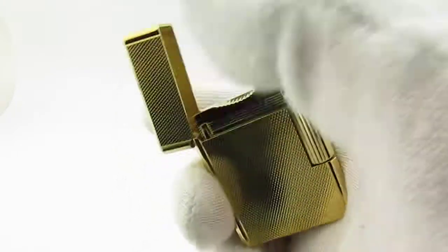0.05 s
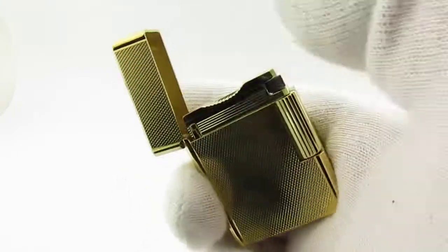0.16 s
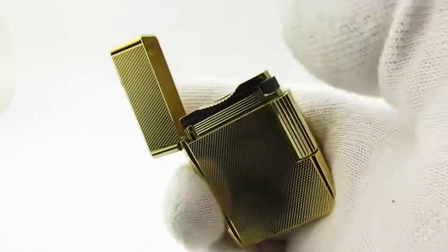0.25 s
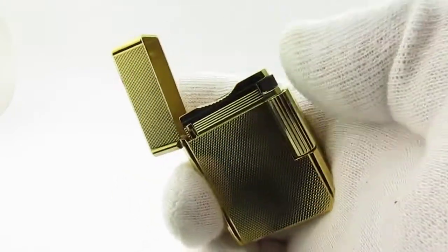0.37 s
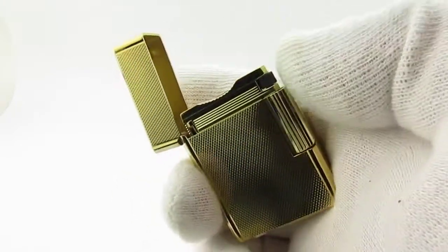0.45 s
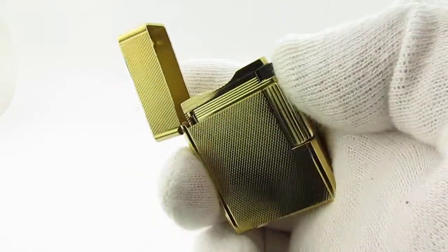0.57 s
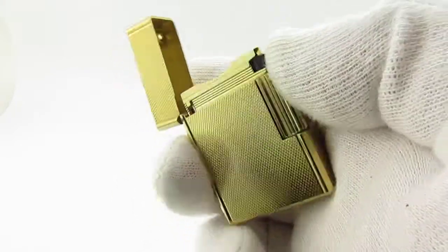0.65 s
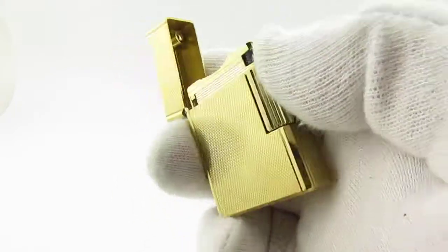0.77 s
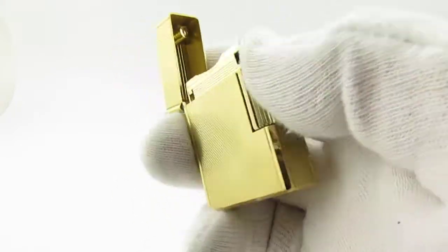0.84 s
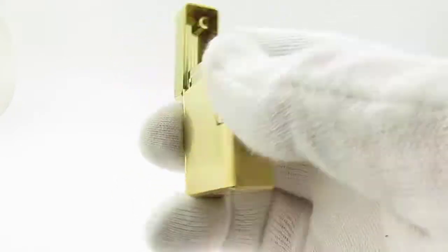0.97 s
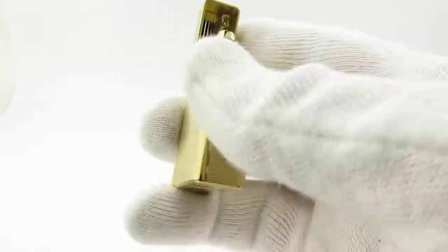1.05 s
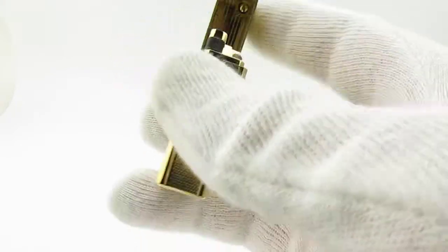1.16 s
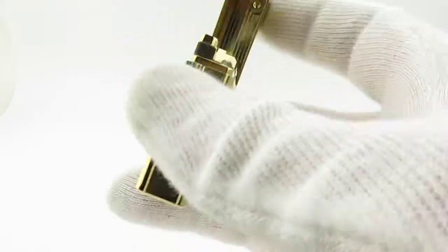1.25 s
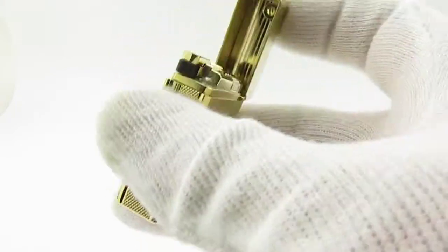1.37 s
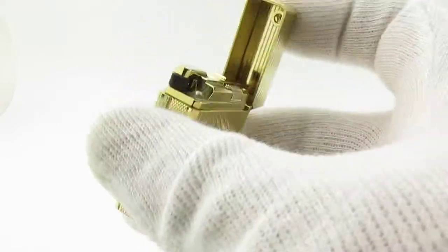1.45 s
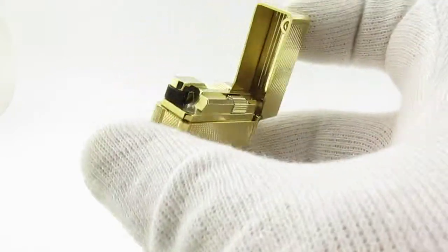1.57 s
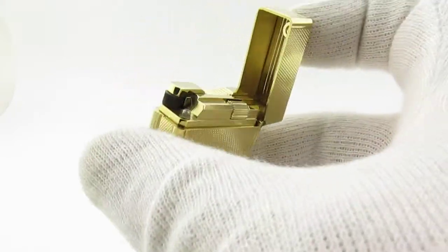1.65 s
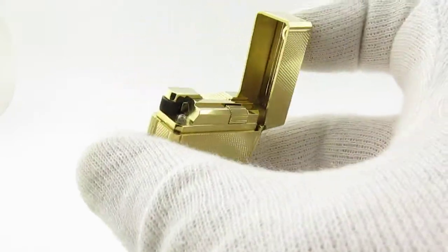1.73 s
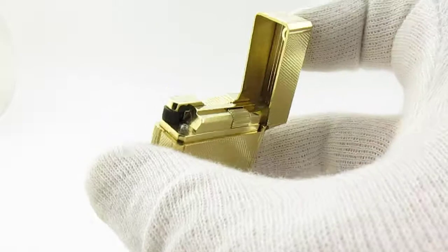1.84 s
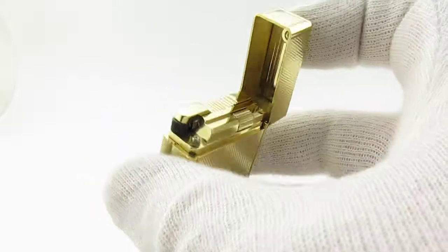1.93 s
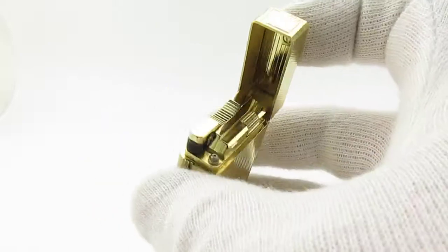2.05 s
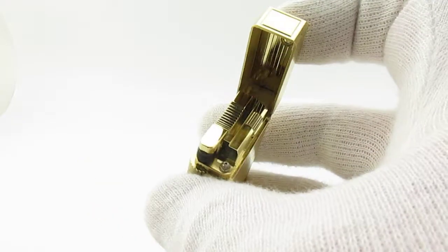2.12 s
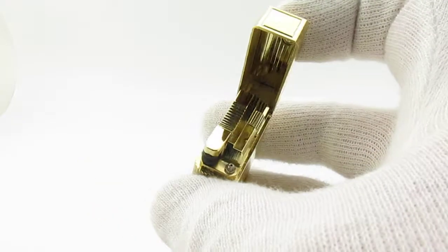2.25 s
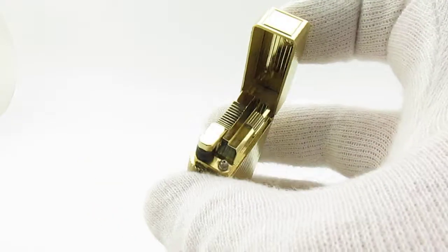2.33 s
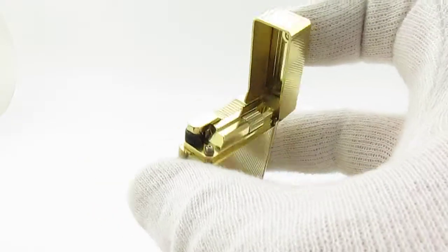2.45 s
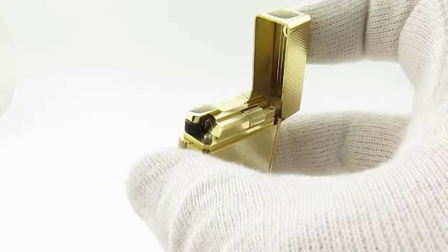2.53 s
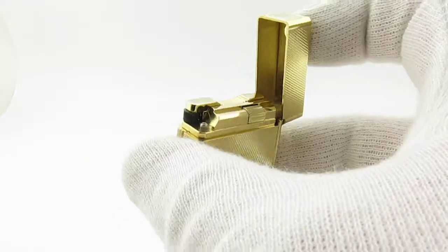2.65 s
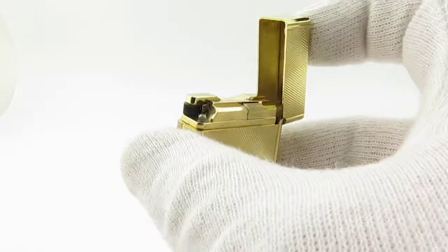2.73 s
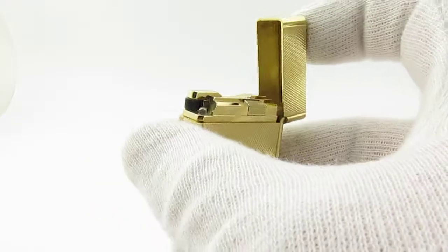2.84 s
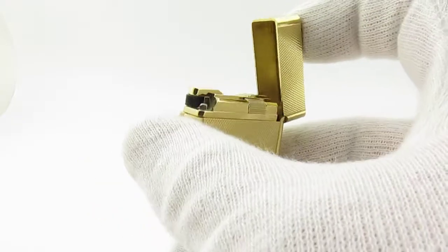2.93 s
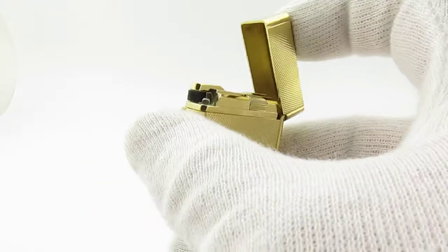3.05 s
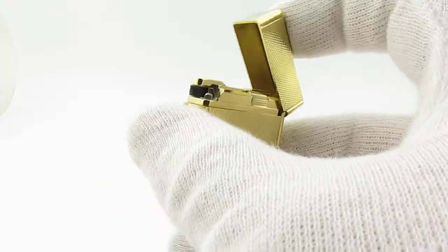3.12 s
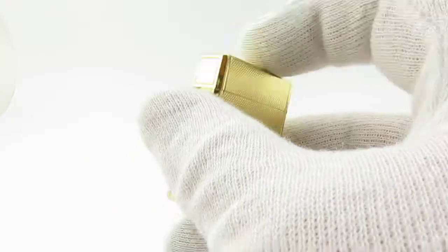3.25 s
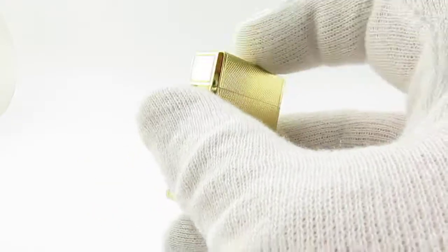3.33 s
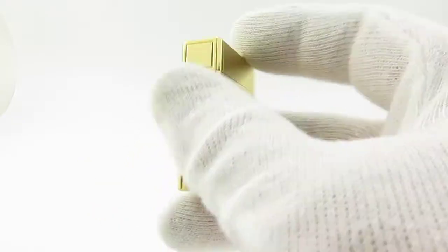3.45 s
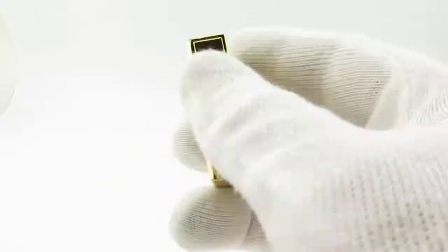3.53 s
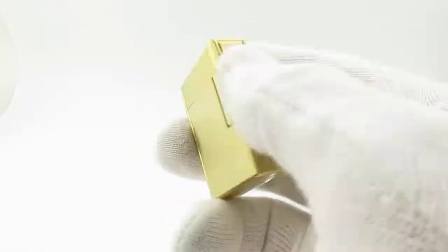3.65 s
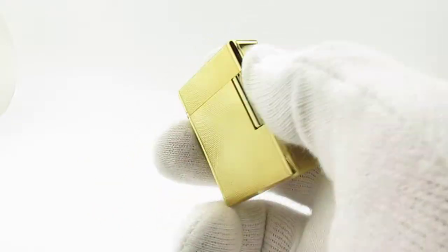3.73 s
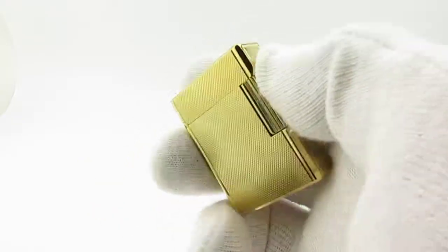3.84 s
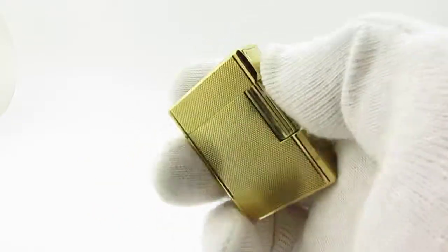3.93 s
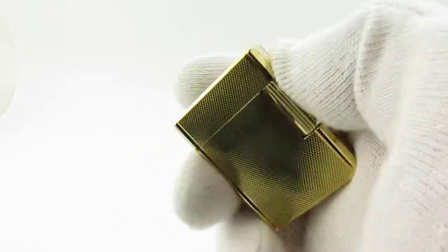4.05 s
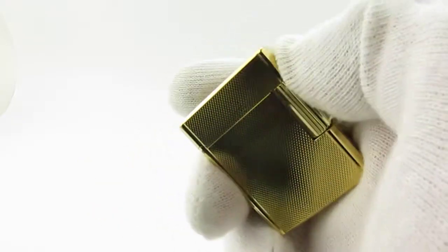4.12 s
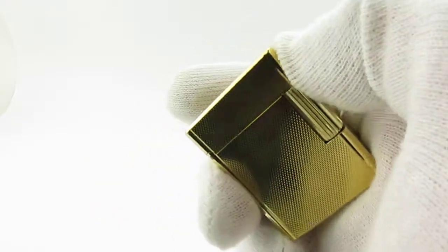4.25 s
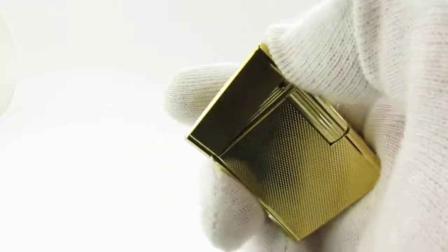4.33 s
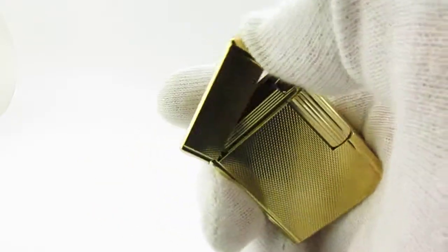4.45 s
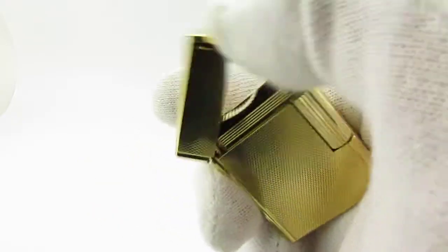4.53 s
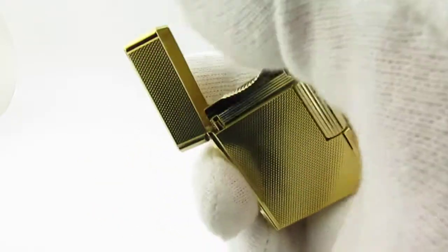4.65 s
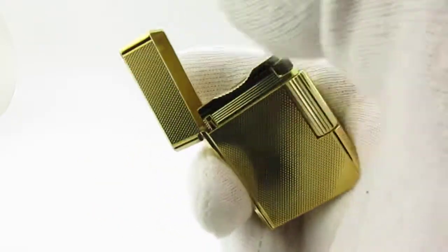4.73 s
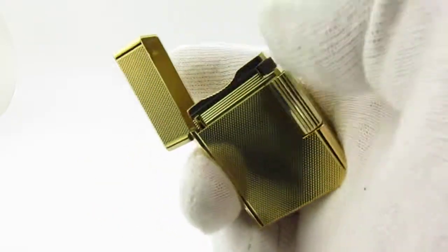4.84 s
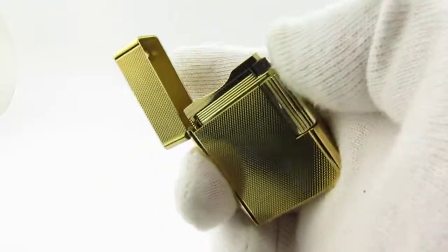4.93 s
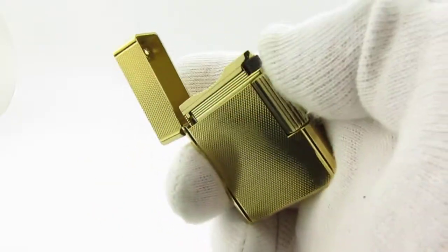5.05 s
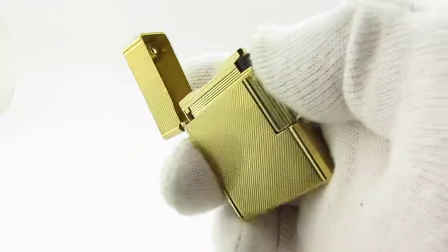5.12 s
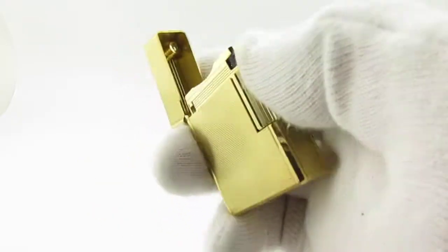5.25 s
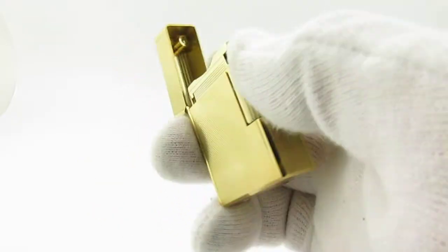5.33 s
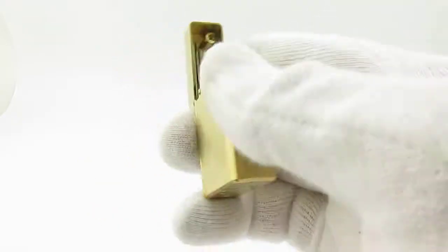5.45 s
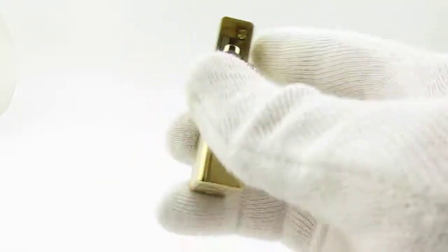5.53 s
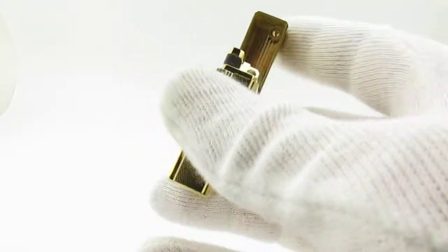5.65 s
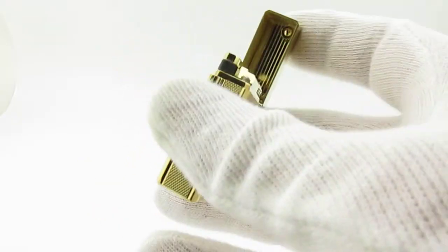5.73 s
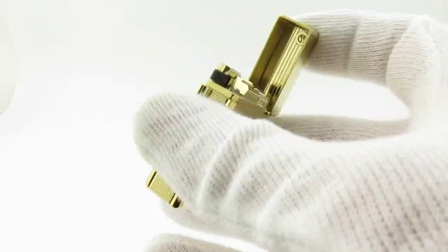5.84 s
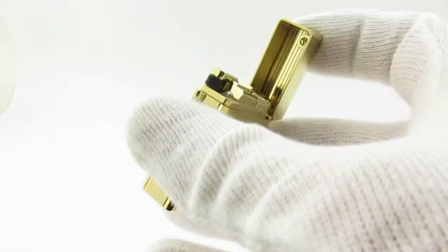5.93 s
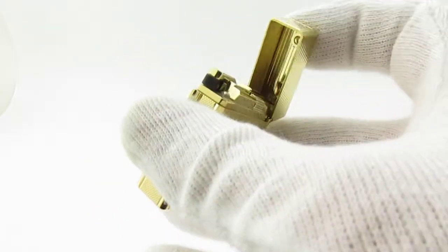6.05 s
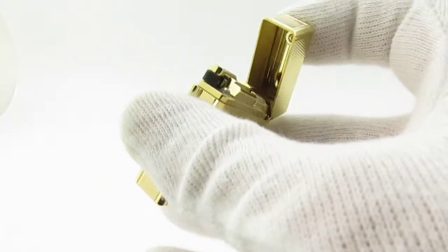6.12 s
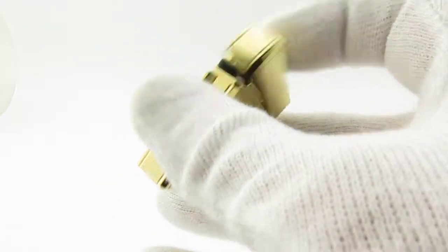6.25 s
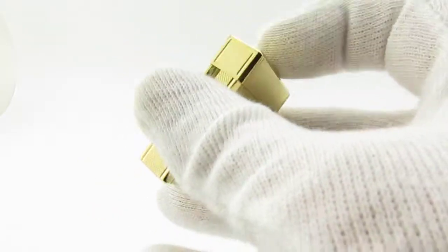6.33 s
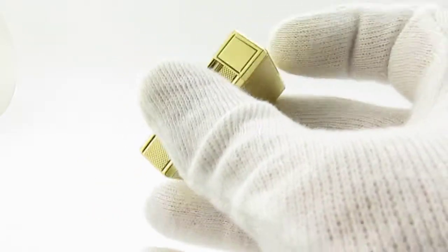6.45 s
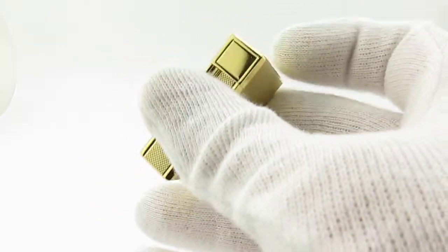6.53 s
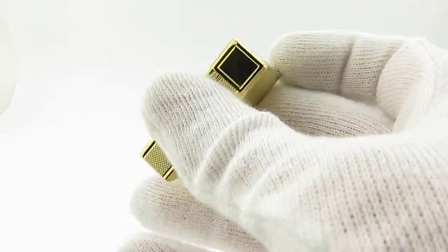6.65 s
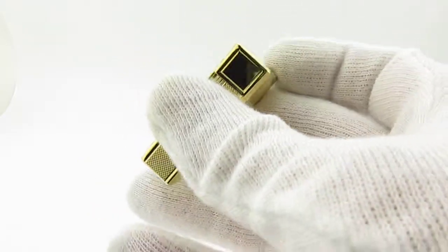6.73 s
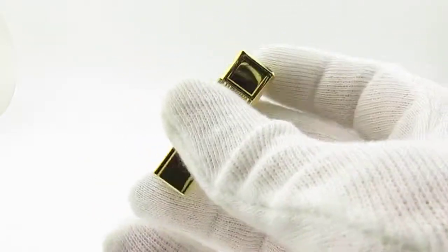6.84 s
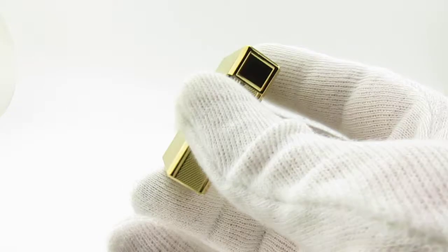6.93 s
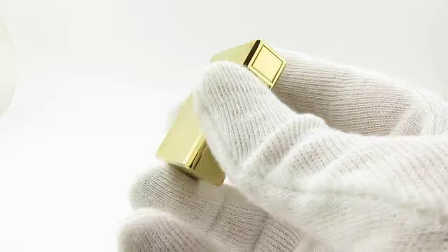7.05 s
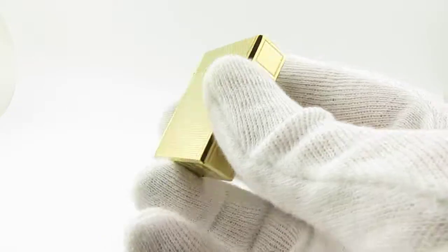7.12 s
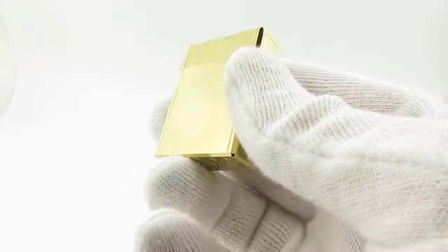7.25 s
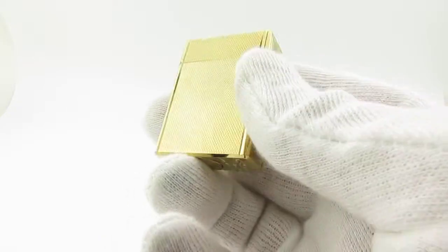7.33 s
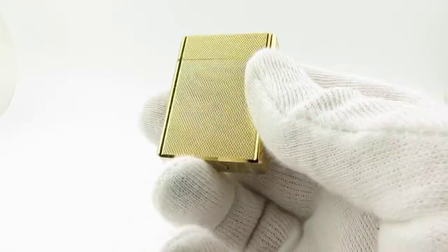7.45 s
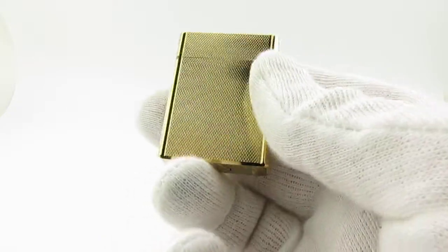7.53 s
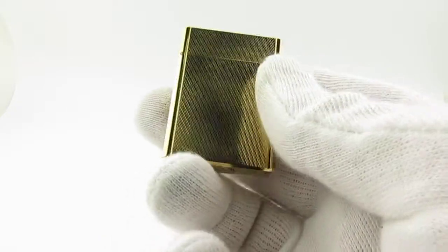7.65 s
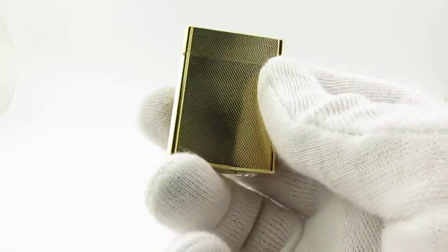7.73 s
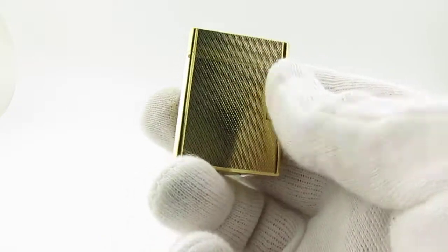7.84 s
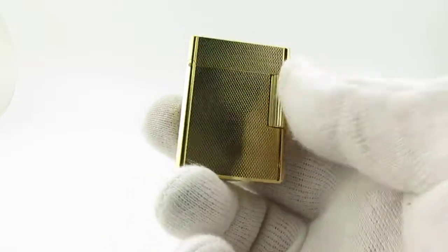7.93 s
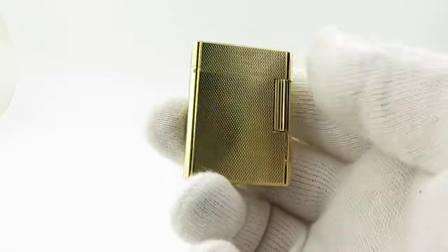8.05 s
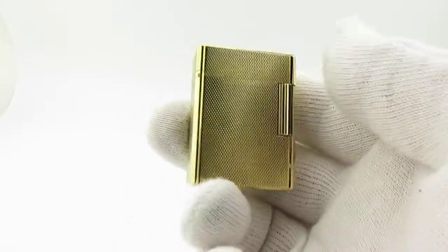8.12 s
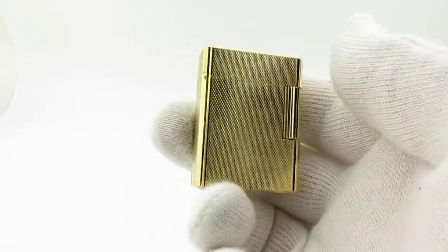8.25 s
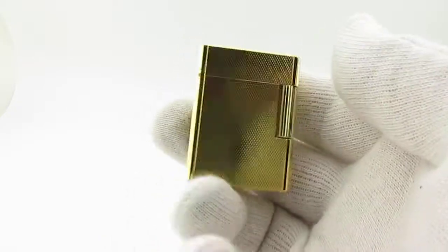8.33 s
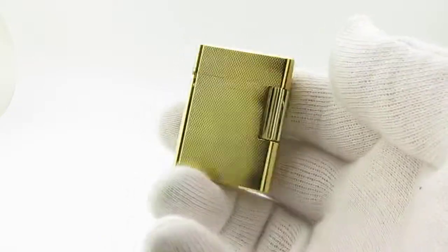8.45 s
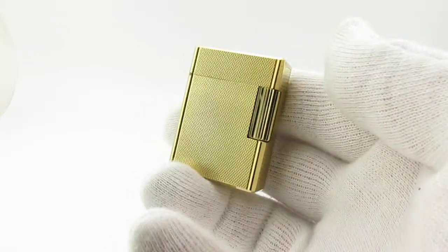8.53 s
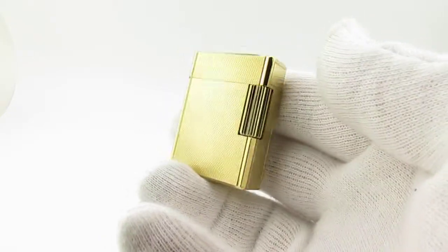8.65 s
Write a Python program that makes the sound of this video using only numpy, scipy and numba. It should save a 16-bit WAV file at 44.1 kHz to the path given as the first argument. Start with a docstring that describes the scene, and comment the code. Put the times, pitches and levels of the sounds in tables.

```python
"""A brass lighter's lid is flicked open and snapped shut, twice, by a gloved hand close to a small camera.
Each blow rings the lid's damped modes under a noise crack and a thud; landings also make the case shimmer.
Gas hisses as filtered noise while the lid stands open; gloves rustle and scrape, and fingers tick.
The quiet room adds a diffuse echo, room tone, hum, rumble and faint tones.
The camera's gain ducks after loud blows and slowly lets the room noise back; peaks over full scale clip."""
import sys
import numpy as np
from scipy import signal
from scipy.fft import rfft, irfft, next_fast_len
from scipy.io import wavfile
from scipy.ndimage import uniform_filter1d
from numba import njit

SR = 44100
rng = np.random.default_rng(int(sys.argv[2]) if len(sys.argv) > 2 else 0)


def materialize(psi):
    """Save the field psi as 16-bit PCM at rate SR to the path in sys.argv[1].

    A 1-D psi becomes a single channel; in a 2-D psi each row is a channel.
    """
    bounded = np.clip(np.atleast_2d(psi).T, -1, 1)
    quanta = np.round(bounded * 32767).astype(np.int16)
    wavfile.write(sys.argv[1], SR, quanta)


N = 382562
TIME = np.arange(N) / SR

# the lid meets its stop: [start_s, force_db]
FLICKS = [(0.0008, -.5), (4.5478, -.5)]
# the lid lands on the body: [start_s, force_db]
SNAPS = [(3.2441, 0), (6.2581, -.5)]
# each flick: the latch lets go, the lid hits the stop and rattles there:
# [after_stop_s, ring_db, crack_db, hardness_db_per_octave]
OPENING = [(-.0091, -46, -17, -1.5), (0, -23, -19, 4), (.0012, -22, -9, 7), (.004, -28, -24, -3),
           (.007, -27, -26, 1.5), (.0137, -28, -26, 1.5), (.0168, -27, -20, -1.5),
           (.0215, -27.5, -27, -1.5)]
# each snap: the lid lands and bounces ever lower:
# [after_landing_s, ring_db, crack_db, hardness_db_per_octave]
SHUTTING = [(0, -0.5, 0.5, -1.5), (.0009, -6.5, -2.5, 2.5), (.0018, -14.5, -13.5, 0),
            (.0037, -16.5, -11.5, 1.5), (.0063, -19, -17.5, 2.5), (0.0089, -20.5, -17.5, 6)]
# lid modes, levels relative to each blow:
# [pitch_hz, open_level_db, shut_level_db, open_t60_s, shut_t60_s, left_minus_right_db]
LID_MODES = [(2010, -27, -24, 0.073, 0.1, -3), (2810, -10, -12.5, 0.039, 0.03, 0),
             (3050, -9.5, -16.5, 0.032, 0.012, -1.5), (3710, -9.5, -26, 0.079, .02, -1),
             (3840, -16, -24.5, 0.044, .02, 3.5), (4790, -63, -7.5, 0.03, 0.017, -3),
             (4581, 7, -22, .25, .6, 1), (4538, -30, -24, .2, .5, -1), (4642, -30, -26, .2, .45, 1),
             (4370, -11, -15, 0.017, .03, -4.5), (5920, -9.5, -13.5, 0.027, 0.026, -2.5),
             (5620, -8.5, -14.5, 0.016, 0.0092, -5.5), (6120, -13.5, -7.5, 0.033, 0.028, -5.5),
             (6902, -21, -20, 0.056, 0.011, -0.5), (7500, -23.5, -9.5, 0.054, 0.028, 2.5),
             (8100, -15, -10.5, 0.029, 0.027, -1), (8680, -11, -5, 0.075, .06, 5),
             (9240, -16.5, -11, 0.018, 0.031, 1.5), (10050, -11.5, -11.5, .03, 0.21, 2),
             (9423, -7.5, -10, 0.012, 0.018, 5.5), (11420, -7.5, -12, 0.036, 0.14, 5),
             (10730, -12, -7, 0.014, .06, 6), (12570, -17, -10, .02, 0.016, 9),
             (13070, -11, -10, .025, .035, 8), (14220, -22, -9, .02, 0.021, 3),
             (14780, -24, -4, .02, .06, 0), (15734, -20.5, -6.5, .02, 0.046, -2)]
# colour of the crack before hardness: [pitch_hz, open_db_per_hz, shut_db_per_hz]
CRACK_COLOUR = [(500, -10, -33), (1500, -19.5, -20), (2400, -16, -10.5), (3100, 0, -11.5),
                (6000, -2.5, 1.5), (7800, -8.5, -8), (9600, -1, 0.5), (12787, -10.5, 0.5),
                (14700, -16, 0.5)]
# the closed case rings on too many modes to tell apart: [pitch_hz, level_db_per_hz]
CASE_COLOUR = [(900, -26), (1900, -4), (3300, -7), (4250, -10), (4600, 2), (4950, -8), (7900, -8),
               (8500, 3), (9000, -5), (10700, 0), (14100, -5), (14750, 4), (15300, -5)]
# small ticks and knocks as the fingers shift: [start_s, level_db, pitch_hz, t60_s, left_minus_right_db]
TICKS = [(3.735, -41, 6700, 0.003, -13), (3.735, -44.5, 2000, 0.0035, -16), (4.547, -45, 190.4, 0.16, -9),
         (7.487, -52.5, 1005, 0.013, -6), (7.560, -53, 10000, 0.0069, -1), (8.035, -54, 1045, .02, -5),
         (8.315, -50, 1100, 0.02, -7), (8.418, -52, 1076, 0.02, -1.5)]
# resonances of the burner's small cavities: [pitch_hz, width_hz, level_db]
GAS_CAVITIES = [(2880, 550, -3), (8700, 530, -7), (10700, 550, 1), (13000, 720, -1)]
# glove cloth sliding over metal and cloth: [start_s, length_s, level_db]
RUBS = [(.66, .1, -61.5), (.79, 0.028, -58.5), (.9, .08, -61.5), (3.97, .13, -58.5), (4.3, 0.54, -63.5),
        (5.18, .12, -63.5), (5.36, 0.2, -64.5), (6.75, .03, -61), (7.58, 0.057, -71), (7.86, 0.22, -67.5)]
# colour of the cloth rustle: [pitch_hz, level_db_per_hz]
CLOTH_COLOUR = [(1500, -19.5), (3000, -2.5), (4200, -2.5), (6500, -1.5), (8000, -2.5), (10500, 1.5),
                (13000, -4.5), (15800, -8)]
# glove fibres catching an edge, narrower than the rustle: [start_s, end_s, pitch_hz, width_hz, level_db]
SCRAPES = [(0.764, 0.853, 4470, 1500, -63.5), (4.403, 4.496, 3600, 900, -64.5),
           (4.43, 4.5, 11100, 1500, -64), (5.19, 5.32, 4020, 706, -69)]
# colour of the room's echo: [pitch_hz, level_db_per_hz]
ECHO_COLOUR = [(300, -24.5), (1000, -11), (2000, -3), (4600, 2), (7500, -2.5), (10500, -5), (15000, -8.5)]
# colour of the room tone: [pitch_hz, level_db_per_hz]
ROOM_TONE_COLOUR = [(15, -34), (25, -3), (48, -3.5), (82, -6.5), (153, -6.5), (211, -10), (241, -8.5),
                    (621, -20.5), (1070, -22), (1980, -27.5), (6510, -33.5), (10600, -31), (15900, -38.5)]
# stereo width of the room tone: [pitch_hz, left_right_correlation]
ROOM_LIKENESS = [(50, -0.052), (130, -.4), (500, -0.22), (1400, 0.0068), (15000, -0.022)]
# far traffic rumble swelling: [start_s, length_s, level_db]
RUMBLE_SWELLS = [(.6, 0.8, -54.5), (4.62, 0.31, -52), (6.0, 0.3, -60), (8.3, .4, -60)]
# faint far tones that come and go: [start_s, end_s, pitch_hz, level_db]
TONES = [(1.603, 1.85, 366.6, -67.5), (2.343, 2.5, 736, -68.5), (3.403, 4.005, 736, -73),
         (4.651, 5.2, 46.54, -51), (5.872, 6.25, 292, -62)]

LATCH_THUD_DB, LANDING_THUD_DB = -6, 3  # first contact of a flick and of a snap
BOUNCE_THUD_DB = -24  # later contacts, relative to their crack
THUD_OPEN_HZ, THUD_SHUT_HZ, THUD_RISE_S, THUD_FALL_S = 2800, 4800, .00007, .0003
CRACK_T60_OPEN_S, CRACK_T60_SHUT_S, CRACK_LIKENESS = .025, .008, .45  # likeness: left-right correlation
PHASE_SPREAD = .23  # share of a turn by which a mode can differ between the microphones
KEPT_DB = -7  # each new contact chokes the ringing left by the blows before it
SMALL_BODY_HZ = 580  # the lighter is too small to radiate well below this
CASE_DB, CASE_T60_S = -23.5, 0.47
GAS_DB, GAS_BUILD_S = -71.5, .45  # full flow; time to reach it once the lid is open
RUB_RISE_DB_S, RUB_FALL_DB_S = 160, 70  # slopes around a slide
GRIP_DB = -75.5  # the faint rustle between slides
ECHO_DB, ECHO_T60_S, ECHO_GAP_S = -23, .4, .006  # the gap is the echo's build-up time constant
ROOM_TONE_DB = -54
HUM_HZ, HUM_WIDTH_HZ, HUM_DB = 212.1, 4.7, -66
RUMBLE_DB, RUMBLE_SLOPE_DB_S = -63.5, 27  # between swells; slope of each swell
MIC_LOW_HZ, TOP_HZ = 32, 15800
DUCK_AT_DB, DUCK_SLOPE = -13.5, 1.5  # threshold; dB of cut per dB over it
DUCK_SENSE_S, DUCK_ATTACK_S, DUCK_HOLD_S, DUCK_RELEASE_S = 0.0045, 0.014, 0.45, 0.5


def lid():
    """Every blow rings the modes, cracks the faces and pushes the whole body in one thud."""
    out = np.zeros((2, N))
    pitch_hz, open_db, shut_db, open_t60, shut_t60, pan_db = np.transpose(LID_MODES)
    crack_hz, crack_open, crack_shut = np.transpose(CRACK_COLOUR)
    reach = mode_reach(pan_db)
    flicks = contacts(FLICKS, OPENING, LATCH_THUD_DB)
    snaps = contacts(SNAPS, SHUTTING, LANDING_THUD_DB)
    # the opening thud pushes the air the opposite way to the shutting one
    for blows, mode_db, t60, colour_db, crack_t60, thud_hz, way in (
            (flicks, open_db, open_t60, crack_open, CRACK_T60_OPEN_S, THUD_OPEN_HZ, -1),
            (snaps, shut_db, shut_t60, crack_shut, CRACK_T60_SHUT_S, THUD_SHUT_HZ, 1)):
        t = np.arange(SR // 2) / SR
        modes = np.exp(2j * np.pi * pitch_hz[:, None] * t) * decay(t, t60[:, None])
        colour = np.transpose([crack_hz, colour_db])
        lead, push = thud(thud_hz)
        times = np.array(blows)[:, 0]
        for s, ring_db, crack_db, thud_db, hard_db in blows:
            strength = undb(ring_db + mode_db + hard_db * np.log2(pitch_hz / 6000))
            ring = ((reach * strength) @ modes).imag
            add(out, s, choke(times, s, t) * ring)
            add(out, s, undb(crack_db) * crack(colour, hard_db, crack_t60))
            add(out, s + lead[0], way * undb(thud_db) * np.tile(push, (2, 1)))
    return signal.sosfilt(signal.butter(1, SMALL_BODY_HZ, "high", fs=SR, output="sos"), out)


def mode_reach(pan_db):
    """Each mode reaches each microphone with its own phase and strength."""
    turn, skew = rng.random((len(LID_MODES), 2)).T - np.array([[0], [.5]])
    phase = turn + PHASE_SPREAD * skew * np.array([[1], [-1]])
    return undb([pan_db / 2, -pan_db / 2]) * np.exp(2j * np.pi * phase)


def choke(times, s, t):
    """Every later contact damps the ringing of the blow at s by a further step."""
    later = np.searchsorted(times, s + t) - np.searchsorted(times, s) - 1
    return uniform_filter1d(undb(KEPT_DB * np.maximum(later, 0)), size=16)


def crack(colour, hard_db, t60):
    """The faces meet in a short noise burst; a harder contact tilts it towards the treble."""
    size = 2048
    burst = noise(lambda f: undb(on_log(colour, f) + hard_db * np.log2(f / 6000 + 0.053)), size,
                  lambda f: CRACK_LIKENESS + 0 * f)
    return burst * decay(np.arange(size) / SR, t60)


def thud(pitch_hz):
    """The body is pushed: a steep rise up to the contact, then a heavily damped swing."""
    lead = np.arange(-40, 200) / SR
    swing = np.cos(2 * np.pi * pitch_hz * lead) * np.exp(-lead / THUD_FALL_S)
    return lead, np.where(lead < 0, np.exp(lead / THUD_RISE_S), swing)


def contacts(events, pattern, thud_db):
    """Rows (s, ring dB, crack dB, thud dB, hardness) of one pattern played at every event."""
    rows = []
    for s, force_db in events:
        for k, (lag, ring_db, crack_db, hard_db) in enumerate(pattern):
            push_db = crack_db + BOUNCE_THUD_DB if k else thud_db
            rows.append((s + lag, force_db + ring_db, force_db + crack_db, force_db + push_db, hard_db))
    return rows


def case():
    """Each landing of the lid leaves a dense shimmer of decaying noise in the closed case."""
    out, t = np.zeros((2, N)), np.arange(SR // 2) / SR
    for s, ring_db, *_ in contacts(SNAPS, SHUTTING, LANDING_THUD_DB):
        shimmer = noise(lambda f: undb(on_log(CASE_COLOUR, f)), len(t))
        add(out, s, undb(ring_db + CASE_DB) * decay(t, CASE_T60_S) * shimmer)
    return out


def ticks():
    """Each tick is one damped resonance."""
    out, t = np.zeros((2, N)), np.arange(SR // 4) / SR
    for s, db, hz, t60, pan_db in TICKS:
        sides = undb(db + np.array([[pan_db], [-pan_db]]) / 2)
        add(out, s, sides * np.sin(2 * np.pi * hz * t) * decay(t, t60))
    return out


def gas():
    """A thin jet builds up once the lid is open and stops when it shuts, coloured by the burner's cavities."""
    flow = np.zeros(N)
    for (opened, _), (shut, _) in zip(FLICKS, SNAPS):
        flow += (TIME < shut) * np.clip((TIME - opened) / GAS_BUILD_S, 0, 1)
    hiss = noise(lambda f: sum(undb(db) * band(hz, width)(f) for hz, width, db in GAS_CAVITIES), N,
                 lambda f: 0.36 + 0 * f)
    return undb(GAS_DB) * flow * hiss


def gloves():
    """Knitted cloth slides in a slightly uneven rustle of coloured noise."""
    slides = swells(RUBS, GRIP_DB, RUB_RISE_DB_S, RUB_FALL_DB_S)
    unevenness = undb(1.8 * walk(47))
    return slides * unevenness * noise(lambda f: undb(on_log(CLOTH_COLOUR, f)), N, lambda f: 0.43 + 0 * f)


def scrapes():
    """Fibres catching an edge sound as short swells of narrow noise."""
    out = np.zeros((2, N))
    for start, end, hz, width_hz, db in SCRAPES:
        size = int((end - start) * SR)
        add(out, start, undb(db) * np.sqrt(np.hanning(size)) * noise(band(hz, width_hz), size))
    return out


def room(x):
    """Walls return a diffuse tail, different left and right."""
    t = np.arange(int(.7 * SR)) / SR
    build_up = 1 - np.exp(-t / ECHO_GAP_S)
    tail = noise(lambda f: undb(on_log(ECHO_COLOUR, f)), len(t)) * decay(t, ECHO_T60_S) * build_up
    tail /= np.sqrt(np.sum(tail ** 2) / 2)  # unit energy per side on average
    return undb(ECHO_DB) * signal.fftconvolve(x, tail, axes=1)[:, :N]


def background():
    """Room tone, a wavering narrow hum, swelling low rumble and faint tones lie under everything."""
    tone = noise(lambda f: undb(on_log(ROOM_TONE_COLOUR, f)), N, lambda f: on_log(ROOM_LIKENESS, f))
    hum = undb(HUM_DB + 1.1 * walk(3.6)) * noise(band(HUM_HZ, HUM_WIDTH_HZ), N)
    surge = swells(RUMBLE_SWELLS, RUMBLE_DB, RUMBLE_SLOPE_DB_S, RUMBLE_SLOPE_DB_S)
    rumble = surge * noise(band(47, 22), N, lambda f: 0.34 + 0 * f)
    return undb(ROOM_TONE_DB) * tone + hum + rumble + tones()


def tones():
    """Each far tone is a sine that swells and fades softly."""
    out = np.zeros((2, N))
    for start, end, hz, db in TONES:
        t = np.arange(int((end - start) * SR)) / SR
        fade = np.sqrt(np.sin(np.pi * t / (end - start)))
        add(out, start, np.tile(undb(db) * fade * np.sin(2 * np.pi * hz * t), (2, 1)))
    return out


def swells(rows, base_db, rise_db_s, fall_db_s):
    """Gain that climbs from a base to each (start, length, dB) row, holds and sinks back."""
    db = np.full(N, base_db * 1.)
    for start, length, top_db in rows:
        before = np.maximum(start - TIME, 0)
        after = np.maximum(TIME - start - length, 0)
        db = np.maximum(db, top_db - rise_db_s * before - fall_db_s * after)
    return undb(db)


def noise(gain_at, size, likeness_at=np.zeros_like):
    """Stereo noise of rms 1 with a given colour and left-right correlation."""
    n = next_fast_len(size)
    hz = np.arange(n // 2 + 1) * SR / n
    like = np.clip(likeness_at(hz), -1, 1)
    spectra = rfft(rng.standard_normal((2, n))) * gain_at(hz)
    mid, side = spectra * np.sqrt([1 + like, 1 - like])
    return level(irfft([mid + side, mid - side], n)[:, :size], 0)


def band(centre_hz, width_hz):
    """Gain of one resonance, 3 dB down at the edges of its width."""
    return lambda hz: 1 / np.sqrt(1 + (2 * (hz - centre_hz) / width_hz) ** 4)


def walk(rate):
    """Random levels held 1 / rate s and smoothed twice."""
    k = int(SR / rate)
    steps = np.repeat(rng.standard_normal(N // k + 1), k)
    return uniform_filter1d(uniform_filter1d(steps, k), k)[:N]


def decay(t, t60):
    """Exponential fade, 60 dB down after t60 seconds."""
    return np.exp(-np.log(1000) * t / t60)


def on_log(table, hz):
    """Read a (Hz, value) table on a log-frequency axis."""
    table_hz, values = np.array(table).T
    return np.interp(np.log(hz + 1), np.log(table_hz), values)


def undb(db):
    """Decibels to amplitude."""
    return 10 ** (np.asarray(db) / 20)


def level(x, db):
    """Scale a sound to an rms level in dB."""
    return x * undb(db) / np.sqrt(np.mean(x ** 2))


def add(out, s, sound):
    """Mix a stereo sound in from time s."""
    i = int(round(s * SR))
    sound = sound[:, max(-i, 0):N - i]
    out[:, max(i, 0):max(i, 0) + sound.shape[1]] += sound


def scene():
    """The lighter and finger ticks excite the room; the other layers are added without echo."""
    near = lid() + case() + ticks()
    return near + room(near) + gas() + gloves() + scrapes() + background()


@njit
def duck(over_db, attack, hold, release):
    """Gain cut in dB: aims at the highest recent excess, holds it, then lets go."""
    cut, aim, now, wait = np.empty(len(over_db)), 0., 0., 0.
    for i in range(len(over_db)):
        if over_db[i] > aim:
            aim, wait = over_db[i], hold
        elif wait > 0:
            wait -= 1
        else:
            aim -= release * aim
        now += attack * (aim - now)
        cut[i] = now
    return cut


def record(dry):
    """The microphone drops the deepest bass, gain control ducks, the converter clips and the top is cut."""
    dry = signal.sosfilt(signal.butter(2, MIC_LOW_HZ, "high", fs=SR, output="sos"), dry)
    window = int(DUCK_SENSE_S * SR)
    # the origin makes the average look back only
    power = uniform_filter1d(np.mean(dry ** 2, axis=0), window, origin=int(DUCK_SENSE_S * SR - 1) // 2)
    over_db = DUCK_SLOPE * (10 * np.log10(np.abs(power) + 1e-12) - DUCK_AT_DB)
    cut_db = duck(over_db, 1 / (DUCK_ATTACK_S * SR), DUCK_HOLD_S * SR, 1 / (DUCK_RELEASE_S * SR))
    clipped = np.clip(dry * undb(-cut_db), -1, 1)
    return signal.sosfilt(signal.ellip(10, .2, 60, TOP_HZ, fs=SR, output="sos"), clipped)


dry = scene()
out = record(dry)
materialize(out)
```